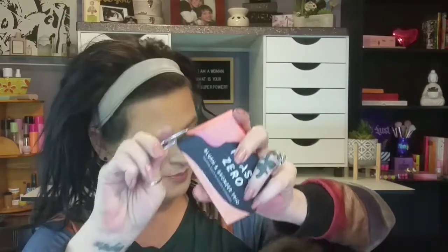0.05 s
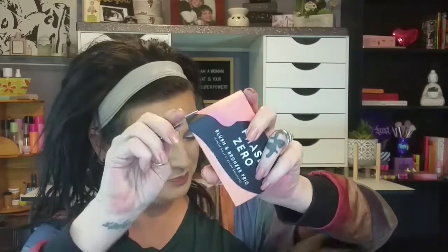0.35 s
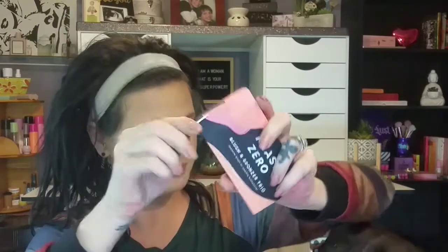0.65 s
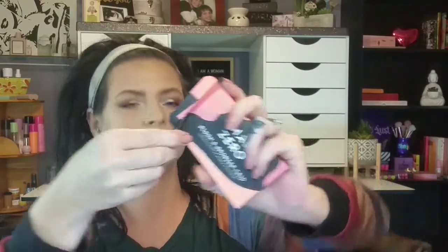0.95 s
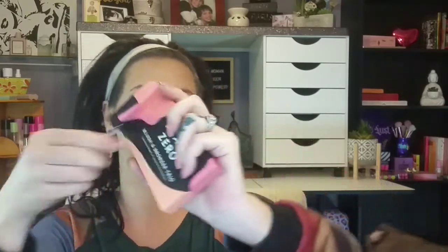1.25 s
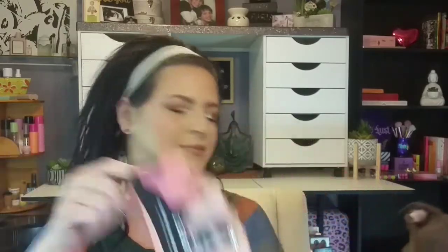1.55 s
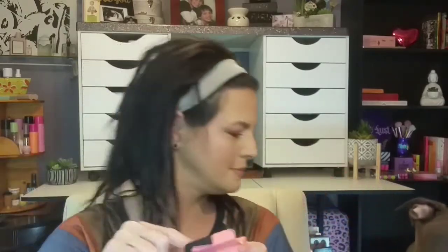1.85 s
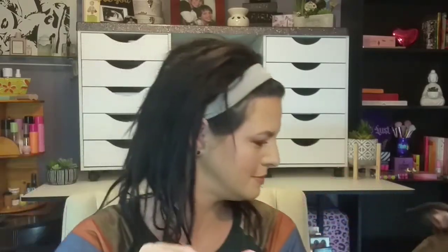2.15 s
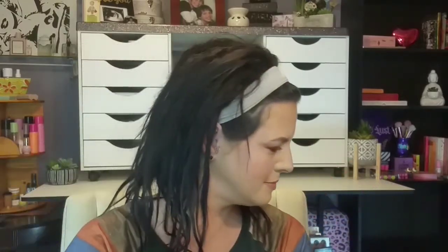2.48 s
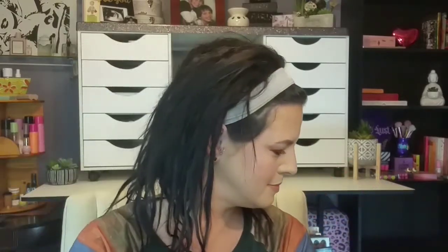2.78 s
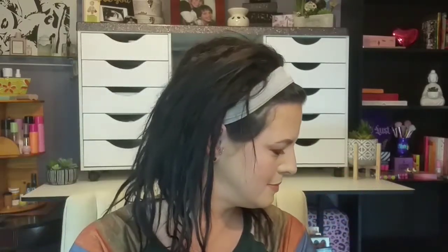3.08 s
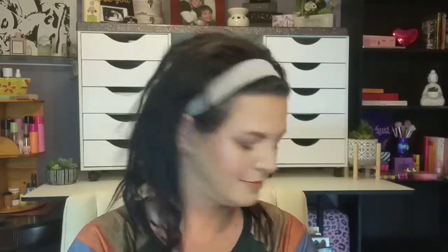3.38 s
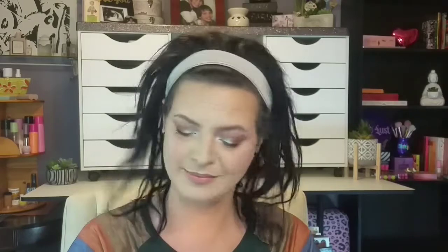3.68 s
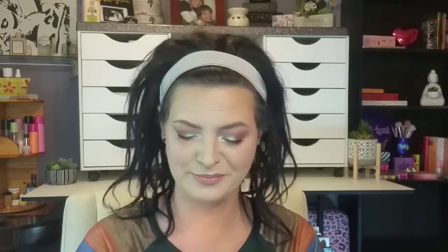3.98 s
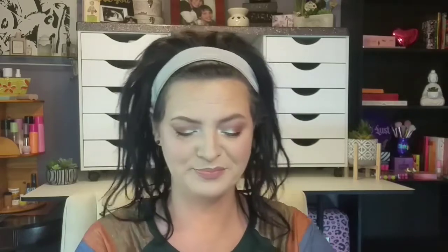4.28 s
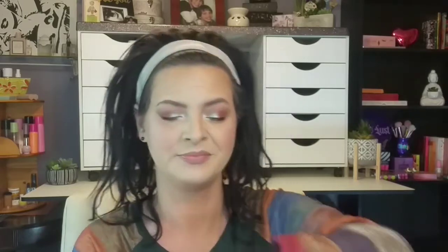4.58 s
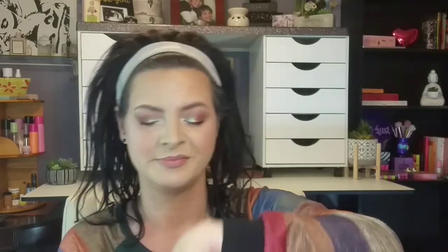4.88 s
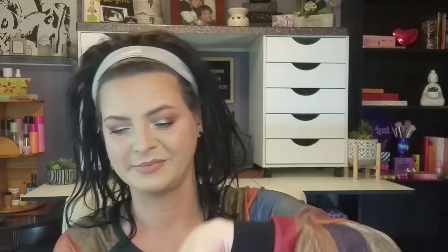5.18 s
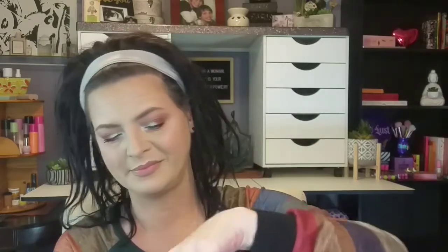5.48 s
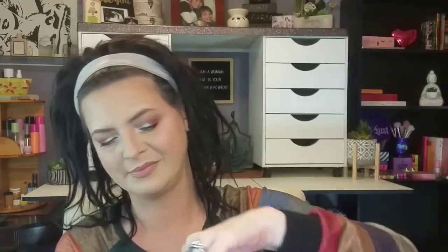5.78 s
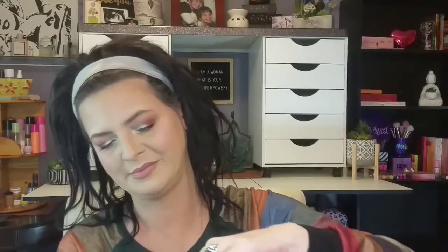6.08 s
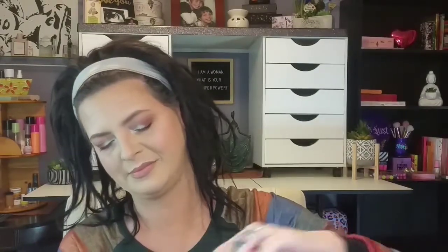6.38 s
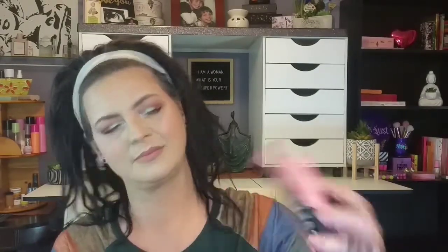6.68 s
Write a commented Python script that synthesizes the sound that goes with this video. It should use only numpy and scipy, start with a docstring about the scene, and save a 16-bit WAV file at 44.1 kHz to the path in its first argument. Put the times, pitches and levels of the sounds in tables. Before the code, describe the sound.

A cardboard carton is pried open with scrapes, snaps and small metal ticks, then knocks on a desk and its contents slide out.

```python
"""A cardboard flap scrapes and snaps over a soft bump: a makeup carton is pried open with a small steel
tool, close to a stereo microphone in a quiet room where a fan hums. The card buckles and rings, the tool
ticks, and the box and things beside it knock and clatter as they are put down and nudged on the desk.
A sleeve and fingers rustle, and the contents rub out of the carton in short tugs and one long pull."""
import sys
import numpy as np
from scipy import signal
from scipy.fft import rfft, irfft, next_fast_len
from scipy.io import wavfile
from scipy.ndimage import map_coordinates

SR = 44100
rng = np.random.default_rng(int(sys.argv[2]) if len(sys.argv) > 2 else 0)


def dump_mix(stems):
    """Bounce the given channels to the path in sys.argv[1] as a 16-bit WAV at rate SR."""
    frames = np.atleast_2d(stems).T  # one column per channel
    limited = np.clip(frames, -1, 1)  # hard clip at full scale
    pcm = np.round(limited * 32767).astype(np.int16)
    wavfile.write(sys.argv[1], SR, pcm)


N = 301644

# Levels in the tables are relative; each source sets its own gain.
# room air and microphone hiss: (frequency [Hz], level [dB])
AIR_SPECTRUM = [(12, -46), (20, -0.5), (116, -2), (284, -11), (482, -12.5), (637, -16), (713, -19.5),
                (819, -17.5), (1600, -23), (1740, -22.5), (1950, -24), (3220, -28.5), (3700, -29.5),
                (6120, -34), (15800, -33.5)]
# a small fan humming in the room: (frequency [Hz], level [dB])
FAN_TONES = [(92, -70.5), (232, -74), (434, -77.5), (468, -76.5), (700, -81.5)]
# likeness of diffuse sound at the two microphones: (frequency [Hz], coherence [0-1])
MIC_COHERENCE = [(25, 0), (70, 0.26), (200, 0.54), (450, 0.13), (900, 0.1), (2000, 0.12), (5000, 0.027),
                 (15000, 0)]
# the room's decay: (frequency [Hz], t60 [s])
ROOM_DECAY = [(150, 0.39), (1000, 0.16), (4000, 0.17), (7000, 0.2), (15000, 0.28)]
# echoes off the desk and nearby furniture: (left delay [s], right delay [s], level [dB])
NEAR_ECHOES = [(.0012, 0.001145, -33), (.0029, .0027, -19.5), (.0046, .0052, -11), (.0083, .0074, -12.5)]
# the arm reaching across: (start [s], rise [s], hold [s], release [s], level [dB])
SLEEVE_MOVE = (4.5, 0.03, 0.15, 0.26, -58)
# the sleeve's cloth: (frequency [Hz], level [dB])
CLOTH_SPECTRUM = [(250, 2.5), (700, 1), (1200, 0.5), (2200, 0), (3500, -5), (5000, -5), (6500, 0),
                  (7600, -12), (11000, -15.5), (16000, -17)]
# bumps on the desk: (time [s], rise [s], thud [dB], knock [dB], knock pitch [Hz], clatter [dB])
DESK_BUMPS = [(.545, 0.025, -48, -52.5, 164, -59), (.63, 0.0033, -51.5, -50.5, 230, -52),
              (1.412, 0.015, -45.5, -47.5, 302, -42.5), (1.83, 0.0018, -61, -55.5, 149, -69),
              (1.952, 0.0042, -49.5, -45.5, 213, -50), (2.44, .005, -35.5, -39, 161, -45.5),
              (2.583, .008, -59.5, -63, 238, -78), (2.672, 0.0059, -61, -45, 178, -67.5),
              (2.874, 0.014, -48.5, -52, 280, -60.5), (3.055, 0.0072, -42.5, -45, 221, -44),
              (3.282, 0.0052, -42.5, -42, 168, -53.5), (3.397, 0.0043, -47.5, -55, 156, -60),
              (3.638, 0.0049, -43, -45, 206, -61), (3.804, 0.0051, -53, -54.5, 156, -53.5),
              (3.87, 0.015, -53, -62, 166, -67.5), (3.932, .003, -70, -65, 215, -60.5),
              (4.017, 0.003, -56, -61, 252, -54), (4.042, 0.0088, -42.5, -43.5, 155, -64),
              (4.186, 0.0035, -46.5, -40, 366, -47), (4.237, 0.0062, -56, -41, 276, -51.5),
              (4.308, 0.0053, -53, -49, 191, -70), (4.364, 0.0052, -68, -58.5, 270, -61.5),
              (4.52, 0.0028, -51.5, -63, 300, -68.5), (4.704, 0.017, -51.5, -54, 143, -59),
              (4.755, 0.018, -48, -49.5, 201, -68)]
# modes of the desk top: (frequency [Hz], width [Hz], level [dB])
DESK_MODES = [(80, 33, -24), (106.4, 43, -1.5), (119.2, 15.4, -3)]
# higher modes of a hollow object on the desk: (frequency [Hz], width [Hz], level [dB])
SHELL_MODES = [(236, 22, -1), (323, 49, -0.5), (390.5, 17.5, 1.5), (464, 33, 0), (562, 43, 0),
               (640, 26, -15)]
# modes of a hard case on the desk: (frequency [Hz], width [Hz], level [dB])
CASE_MODES = [(1410, 12, -24), (1453, 12, -31), (1630, 21, -1), (2072, 12, 7.5), (2300, 45, -5),
              (2665, 59, 4), (2900, 54, 8), (3410, 45, 8.5), (3715, 61, 5.5)]
# the case's edges clattering: (frequency [Hz], level [dB])
CLATTER_SPECTRUM = [(70, -65), (250, -3.5), (500, -13), (800, -3), (1300, -4), (2200, -1), (3000, -3.5),
                    (4600, -5), (6400, -6.5), (7800, -18), (11000, -17), (16000, -29)]
# light taps of the steel tool: (time [s], level [dB])
STEEL_TAPS = [(1.136, -46.5), (1.646, -55.5)]
# the tool's modes: (frequency [Hz], level [dB], t60 before extra damping [s])
STEEL_MODES = [(3430, -3, .12), (3550, 3, 0.14), (5730, 0.5, 0.15), (7650, -27, .12), (9800, -7.5, 0.088),
               (13700, -10, .1), (15420, -27, .1)]
# one brighter clink of small metal: (time [s], level [dB])
CLINK_TAPS = [(1.7255, -47.5)]
# the clink's modes: (frequency [Hz], level [dB], t60 before extra damping [s])
CLINK_MODES = [(4930, -10, 0.077), (5000, 5.5, 0.036), (5870, 1, 0.047), (6350, 2, .11), (10770, -4, 0.08),
               (11100, 2.5, 0.083), (13290, -13, .15)]
# strokes of card, fingers and sleeve: (peak time [s], length [s], level [dB], tilt [dB/octave])
RUB_STROKES = [(0.59, .032, -52.5, 2.5), (.632, 0.026, -39.5, 2), (.958, 0.078, -56.5, 3),
               (1.109, 0.24, -66.5, 1), (1.265, .09, -63, 2), (1.408, 0.049, -57.5, 0),
               (1.947, 0.11, -60, 2), (2.172, 0.08, -65, 5.5), (2.325, 0.034, -64.5, 1),
               (2.65, 0.05, -62, -4), (2.762, 0.048, -58.5, 7), (2.917, 0.072, -60, 1.5),
               (3.727, .04, -69, 5), (4.076, 0.026, -57.5, 1), (4.159, 0.073, -59.5, 0),
               (4.207, .035, -48, 1.5), (5.019, 0.065, -56.5, .5), (5.328, 0.057, -55, 1.5),
               (5.795, 0.044, -53.5, 2.5), (6.031, .046, -59.5, 1), (6.259, 0.11, -66, -4),
               (6.359, 0.032, -53.5, -1), (6.716, .04, -62.5, -3)]
# rubbed card: (frequency [Hz], level [dB])
CARD_SPECTRUM = [(60, -60), (200, -20), (500, -3.5), (950, 5), (1400, -3), (2600, 1.5), (3700, -2.5),
                 (5000, -5), (6500, -4), (7800, -14), (11000, -15), (16000, -26)]
# card ringing briefly on one resonance: (time [s], rise [s], frequency [Hz], level [dB])
CARD_RINGS = [(.565, 0.016, 2570, -61), (.612, 0.0068, 2600, -46), (.634, .002, 6400, -48),
              (.921, 0.019, 3700, -57.5), (.925, .015, 2330, -61), (1.35, .022, 2770, -62),
              (1.408, 0.0055, 2500, -42.5), (2.452, 0.0047, 2200, -51.5), (4.193, 0.0032, 2250, -45.5),
              (6.328, 0.0049, 984, -49), (6.33, 0.01, 4800, -58.5)]
# the contents leaving the carton: (start [s], rise [s], hold [s], release [s], level [dB])
PULL_MOVE = (6.395, .095, 0.12, 0.02, -45.5)
# sliding inside the carton: (frequency [Hz], level [dB])
SLIDE_SPECTRUM = [(180, -14), (300, -3), (348, -41), (462, -10), (759, -12.5), (882, 1.5), (1060, 0),
                  (1270, -5), (2050, -5), (2350, -6.5), (2960, -0.5), (12900, -14.5), (15800, -18)]
# snaps of card and fingernails: (time [s], level [dB], panel pitch [Hz], edge pitch [Hz])
CARD_SNAPS = [(.569, -54, 736, 3600), (0.6127, -48, 1510, 4200), (.634, -32.5, 650, 1730),
              (0.6363, -34, 3400, 6100), (1.101, -60.5, 875, 1950), (1.421, -38, 2010, 2530),
              (1.835, -47, 880, 2920), (2.115, -58, 930, 5200), (2.587, -57, 970, 1730),
              (2.7285, -39.5, 950, 3930), (2.7304, -42, 436, 1020), (3.288, -44, 350, 615),
              (3.576, -49.5, 900, 3800), (4.1175, -51, 2500, 4270), (4.187, -45, 2190, 4230),
              (4.196, -42, 2220, 5940), (4.24, -50.5, 2270, 3400), (4.581, -58.5, 1900, 4240),
              (5.614, -59.5, 2080, 5700), (5.989, -53, 930, 1780), (6.259, -59.5, 990, 4460),
              (6.331, -52, 980, 4700), (6.405, -51.5, 1510, 2060), (6.597, -36, 1390, 2060),
              (6.599, -47.5, 457, 840)]
# card taking the top off a sharp force: (frequency [Hz], level [dB])
CARD_SOFTNESS = [(6800, 0), (7800, -2.5), (16000, -3.5)]

TIME = np.arange(N) / SR
AGE = np.arange(SR // 2) / SR  # seconds into one short event
HZ = np.fft.rfftfreq(len(AGE), 1 / SR)


def amp(db):
    """Decibels to gain."""
    return 10 ** (np.asarray(db) / 20)


def unit(x, count=None):
    """Scale so that the first count samples have rms 1."""
    return x / np.sqrt(np.mean(x[..., :count] ** 2) + 1e-20)


def along(points, hz):
    """Read (frequency, value) points on a log axis."""
    freqs, values = np.transpose(points)
    return np.interp(np.log(hz + 1), np.log(freqs), values)


def add(track, s, sound):
    """Mix a sound into a track from time s on."""
    start = max(round(s * SR), 0)
    track[..., start:start + sound.shape[-1]] += sound[..., :N - start]


def wobble(rate, size):
    """A smooth random curve with rate knots a second."""
    knots = rng.standard_normal(int(size * rate / SR) + 4)
    return map_coordinates(knots, [np.arange(size) * rate / SR])


def resonance(hz, width, grid=HZ):
    """Causal response of one damped mode."""
    return 1j * grid * width / (hz * hz - grid * grid + 1j * grid * width)


def tilted(points, tilt=0):
    """A spectrum leaned by tilt dB an octave above 900 Hz."""
    return lambda hz: amp(along(points, hz) + tilt * np.log2(np.maximum(hz, 900) / 3000))


def spread(pair, colour):
    """Colour two unrelated signals and blend them onto the microphones, most alike in the bass."""
    size = pair.shape[-1]
    padded = next_fast_len(size)
    hz = np.fft.rfftfreq(padded, 1 / SR)
    angle = np.arccos(np.clip(along(MIC_COHERENCE, hz), -1, 1)) / 2
    spectrum = rfft(pair, padded) * colour(hz) * [np.cos(angle), np.sin(angle)]
    mid, side = irfft(spectrum, padded)[:, :size]
    return unit(np.array([mid + side, mid - side]))


def friction(colour, size, grain_db, grain_rate):
    """Stereo noise whose strength jumps as fibres catch and let go."""
    return spread(rng.standard_normal((2, size)) * amp(grain_db * wobble(grain_rate, size)), colour)


def swell(rise, t60):
    """A contact that builds up, then dies away."""
    return (1 - np.exp(-(AGE / rise) ** 2)) * amp(-60 * AGE / t60)


def gesture(move, range_db=15):
    """Gain of a slide that gains range_db over its rise, holds, and loses it over its release."""
    start, rise, hold, release, db = move
    early = np.maximum(start + rise - TIME, 0) / rise
    late = np.maximum(TIME - start - rise - hold, 0) / release
    return amp(db - range_db * (early + late))


def in_room(near, wet_db):
    """A close sound and its tail at each microphone: wall echoes hold up briefly, then die away."""
    hz, t, noise = signal.stft(rng.standard_normal((2, len(AGE))), SR, nperseg=256)
    decay = amp(-60 * np.maximum(t - .018, 0) / along(ROOM_DECAY, hz)[:, None])
    tail = signal.istft(noise * decay, SR, nperseg=256)[1][:, :len(AGE)]
    tail = spread(tail * (1 - np.exp(-AGE / 0.00032)), np.ones_like) / np.sqrt(len(AGE))
    return near + amp(wet_db) * signal.fftconvolve(np.atleast_2d(near), tail, axes=1)[:, :len(AGE)]


def echoed(direct):
    """Each microphone also hears the nearest surfaces, which comb the sound."""
    out = direct.copy()
    for left, right, db in NEAR_ECHOES:
        add(out[0], left, amp(db) * direct[0])
        add(out[1], right, amp(db) * direct[1])
    return out * amp(-0.88)


def room_tone():
    """Steady low air noise, microphone hiss and the faint, slightly unsteady hum of a fan."""
    air = spread(rng.standard_normal((2, N)), tilted(AIR_SPECTRUM))
    air = signal.sosfilt(signal.butter(2, 32, "high", fs=SR, output="sos"), air)
    hum = np.zeros(N)
    for hz, db in FAN_TONES:
        peak = amp(db + 1.4 * wobble(3.02, N)) * np.sqrt(2)
        hum += peak * np.sin(2 * np.pi * hz * TIME + 1.07 * wobble(6, N))
    return amp(-57.5) * air + hum


def sleeve():
    """Folds of cloth brush over one another in uneven surges, just right of centre."""
    folds = amp(1.5 + 1.9 * wobble(45, N))
    cloth = friction(tilted(CLOTH_SPECTRUM), N, grain_db=2.5, grain_rate=500)
    return folds * gesture(SLEEVE_MOVE) * cloth * amp([[-.6], [.6]])


def rocking(response, contact):
    """A soft, uneven push on a resonant body: its ringing, evened out and shaped by the contact."""
    ringing = signal.hilbert(irfft(rfft(rng.standard_normal(len(AGE))) * response))
    push = ringing.real / np.abs(ringing) ** 0.98 * contact
    low_cut = signal.butter(5, 58, "high", fs=SR, output="sos")
    return unit(signal.sosfilt(low_cut, push), count=SR // 20)


def case_clatter(contact, tilt):
    """The hard case rattles as its corners touch one after another and ring its modes."""
    def colour(grid):
        modes = sum(amp(db) * resonance(hz, width, grid) for hz, width, db in CASE_MODES)
        return tilted(CLATTER_SPECTRUM, tilt)(grid) * np.abs(1.28 + modes)

    edges = friction(colour, len(AGE), grain_db=1.0, grain_rate=300)
    rattle = amp(1.64 * wobble(150, len(AGE)))
    return unit(edges * rattle * contact, count=SR // 20)


def desk_bumps():
    """Just left of centre, the hollow object knocks, the case clatters, the desk thuds under the weight."""
    bodies, clatters = np.zeros((2, 2, N))
    desk = sum(amp(db) * np.abs(resonance(hz, width)) ** 2 for hz, width, db in DESK_MODES)
    shell = sum(amp(db) * np.abs(resonance(hz, width)) ** 2 for hz, width, db in SHELL_MODES)
    for s, rise, thud_db, knock_db, knock_hz, clatter_db in DESK_BUMPS:
        decay = .225 + 2.7 * rise  # a slow shove drags on longer
        hardness = clatter_db - knock_db  # harder contact is brighter and rings the shell more
        settle_s = 0.014 + rise
        weight = (1 - np.exp(-AGE / 0.00071)) / np.cosh((AGE - settle_s) / (decay * 0.071))
        thud = amp(thud_db) * rocking(desk, weight)
        hollow = np.abs(resonance(knock_hz, knock_hz * 0.42)) ** 2
        knock = amp(knock_db) * rocking(hollow, swell(rise * 0.64, decay * 0.76))
        ring = amp(knock_db + 0.43 * hardness - 6) * rocking(shell, swell(rise, decay * 0.96))
        clatter = case_clatter(swell(rise * 0.96, decay * 0.86), tilt=-5 + 0.19 * hardness)
        add(bodies, s, in_room(thud + knock + ring, wet_db=-14.5))
        add(clatters, s, amp(clatter_db + 1.08) * clatter)
    return bodies * amp([[.8], [-.8]]) + echoed(clatters) * amp([[.5], [-.5]])


def metal_ticks(taps, modes, crack_db):
    """A tap on small steel: a tiny crack and a few high modes, roughened by the fingers that hold it."""
    out = np.zeros((2, N))
    damping = swell(rise=0.00033, t60=0.089)
    for s, db in taps:
        ring = amp(crack_db - 60 * AGE / 0.039) * rng.standard_normal((2, len(AGE)))
        for hz, level, t60 in modes:
            phase = 2 * np.pi * (hz * AGE + rng.random((2, 1))) + wobble(350, len(AGE))
            ring += amp(level - 60 * AGE / t60) * np.sin(phase) * damping
        add(out, s, amp(db + 2.5) * unit(in_room(ring, wet_db=-8.5), count=SR // 100))
    return out


def rubs(rise_share=0.45, lead_s=0.25):
    """Short strokes over card and cloth swell as they speed up, then fade."""
    out = np.zeros((2, N))
    t = AGE - lead_s  # time from the stroke's peak
    for s, length, db, tilt in RUB_STROKES:
        rise, fall = length * rise_share, length * (1 - rise_share)
        stroke = np.where(t < 0, np.exp(-(t / rise) ** 2 / 2), 1 / np.cosh(1.31 * t / fall))
        scrape = friction(tilted(CARD_SPECTRUM, tilt), len(AGE), grain_db=3.0, grain_rate=550)
        add(out, s - lead_s, amp(db + 2.0) * stroke * scrape)
    return out


def card_rings():
    """The card rings briefly on one resonance, after a snap or as it slips."""
    out = np.zeros((2, N))
    for s, rise, hz, db in CARD_RINGS:
        mode = lambda grid: np.abs(resonance(hz, hz * 0.15, grid)) ** 2
        ring = friction(mode, len(AGE), grain_db=5.5, grain_rate=297)
        envelope = swell(rise, t60=0.092 + 9 * rise)  # a slow rise dies away later
        add(out, s, amp(db) * unit(ring * envelope, count=SR // 20))
    return out


def long_pull():
    """The contents slide along the inside of the carton in one finely grained hiss."""
    hiss = friction(tilted(SLIDE_SPECTRUM), N, grain_db=1.0, grain_rate=550)
    return amp(3.5) * gesture(PULL_MOVE) * hiss * amp([[-.4], [.4]])


def card_snaps():
    """Close to the microphone, card buckles: an impulse and a crackle ring a panel and its stiff edge."""
    out = np.zeros((2, N))
    for s, db, panel_hz, edge_hz in CARD_SNAPS:
        t60 = 0.014 * 2 ** ((-35.5 - db) / 14.5)  # weaker snaps crackle longer
        slowness = np.clip(t60 / 0.014, .5, 2)  # slow buckling is duller and more crackle than impulse
        crackle = rng.standard_normal((2, len(AGE))) * amp(-60 * AGE / t60)
        force = spread(crackle, np.ones_like) / np.sqrt(len(AGE))
        force[:, 0] += 0.58 / slowness  # the impulse
        panel = resonance(panel_hz, panel_hz * 0.17)
        edge = amp(5.5) * panel_hz / edge_hz * resonance(edge_hz, edge_hz * 0.2)
        tautness = min(panel_hz / 890, 1) ** 2  # low panels are too slack for the full crack
        crack = amp(-19) * tautness * resonance(4000, width=3600)
        card = (panel - edge - crack) * amp(slowness * along(CARD_SOFTNESS, HZ))
        snap = in_room(irfft(rfft(force) * card), wet_db=-5.5)
        add(out, s, amp(db + 1.2) * unit(snap[:, :SR // 3], count=SR // 100))
    return out


def scene():
    """Close handling at the desk, with its early echoes, over the tone of the room."""
    steel = metal_ticks(STEEL_TAPS, STEEL_MODES, crack_db=0.5)
    clink = metal_ticks(CLINK_TAPS, CLINK_MODES, crack_db=-5)
    bumps = desk_bumps()
    carton = card_snaps() + card_rings() + rubs() + long_pull()
    return bumps + echoed(carton + steel + clink + sleeve()) + room_tone()


def record(dry):
    """The recorder keeps nothing above its band limit."""
    top_hz = 15750
    padded = next_fast_len(N + SR // 2)
    passband = np.fft.rfftfreq(padded, 1 / SR) < top_hz
    return irfft(rfft(dry, padded) * passband, padded)[:, :N]


dry = scene()
out = record(dry)
dump_mix(out)
```